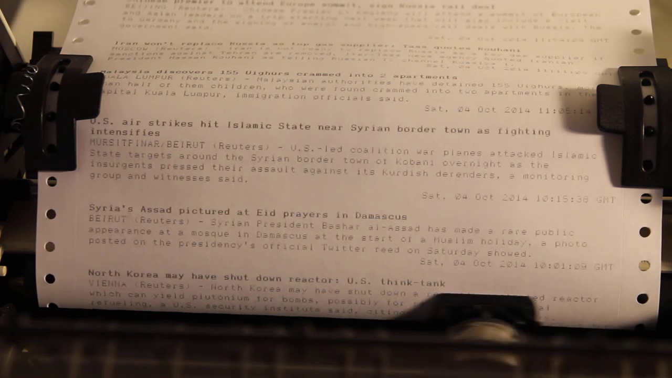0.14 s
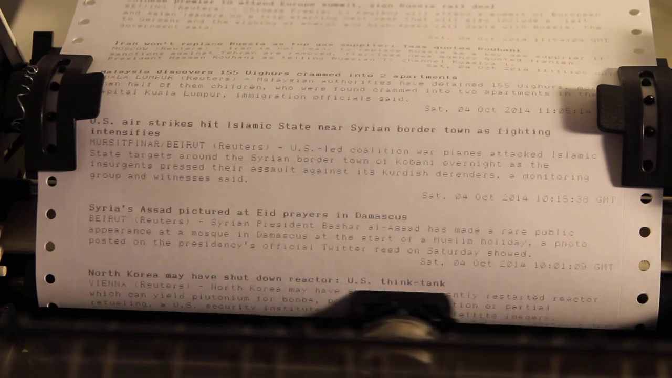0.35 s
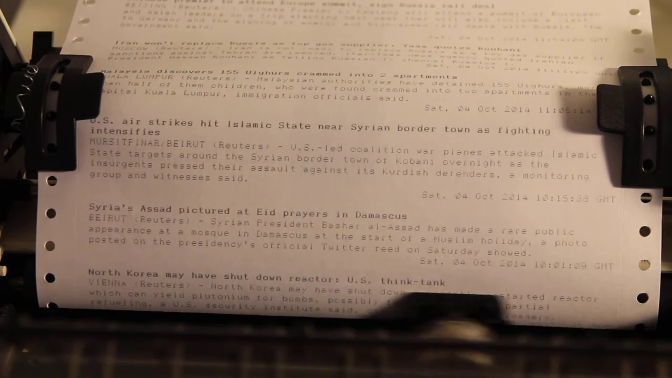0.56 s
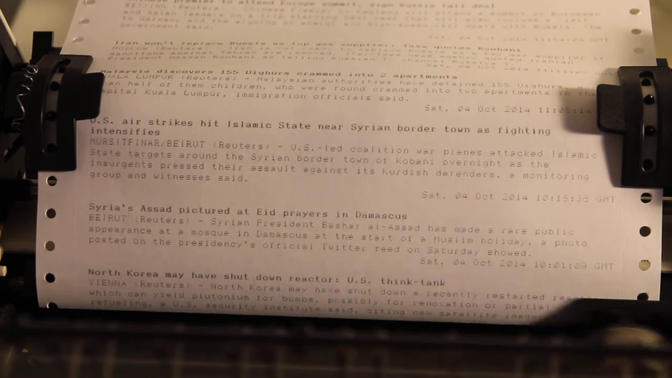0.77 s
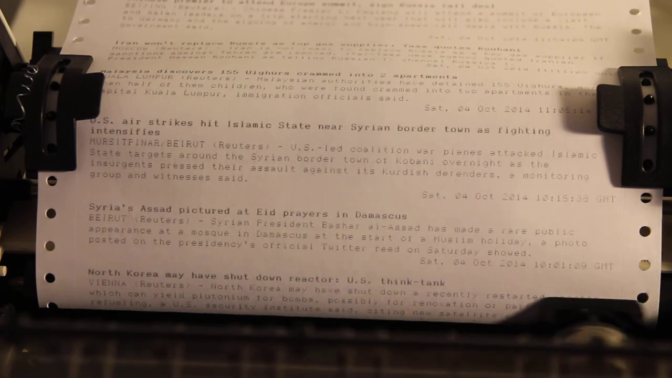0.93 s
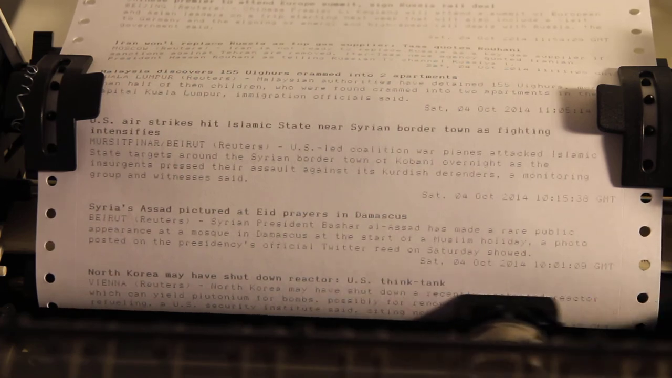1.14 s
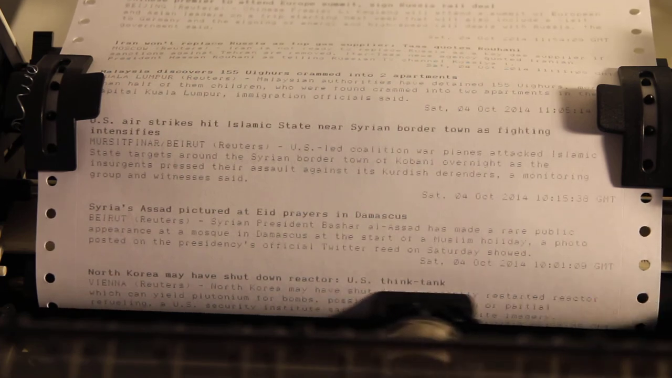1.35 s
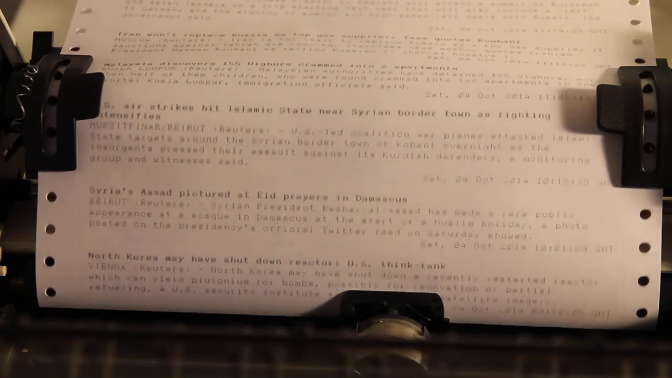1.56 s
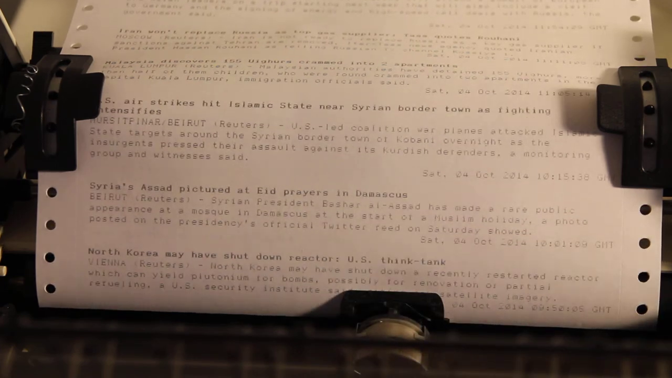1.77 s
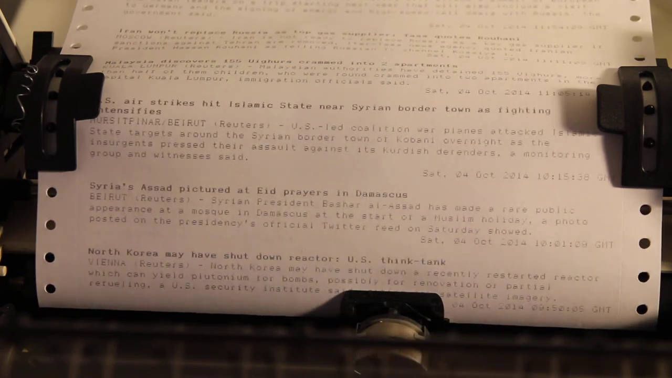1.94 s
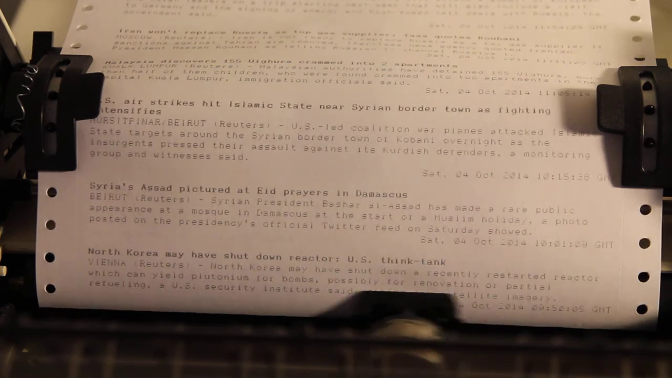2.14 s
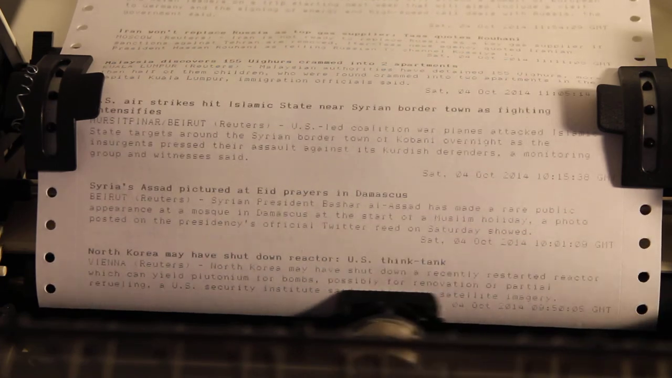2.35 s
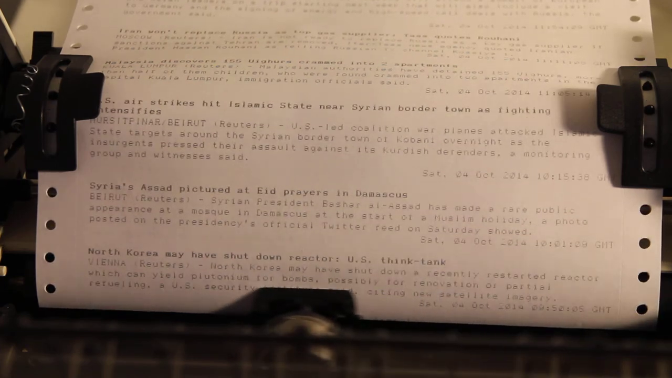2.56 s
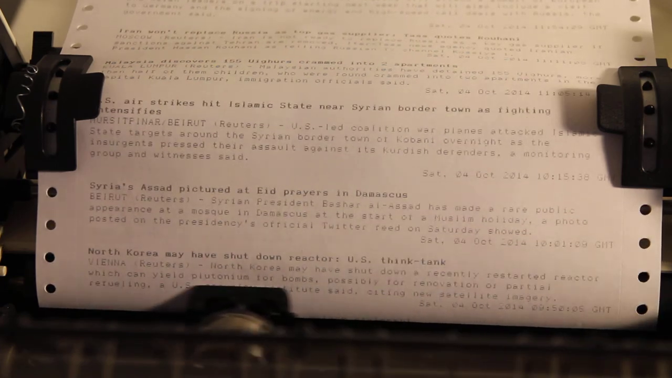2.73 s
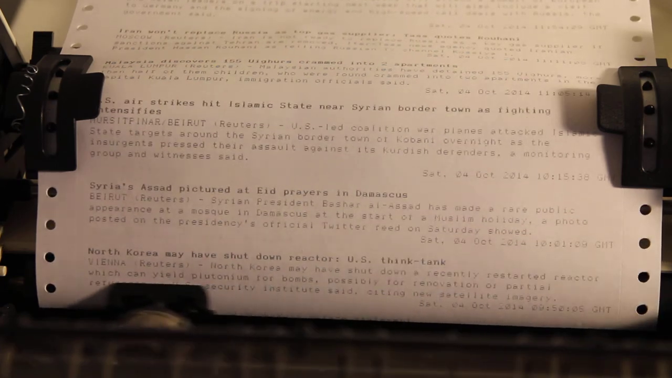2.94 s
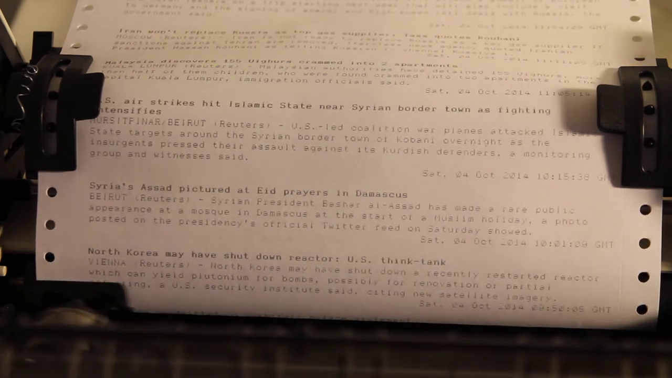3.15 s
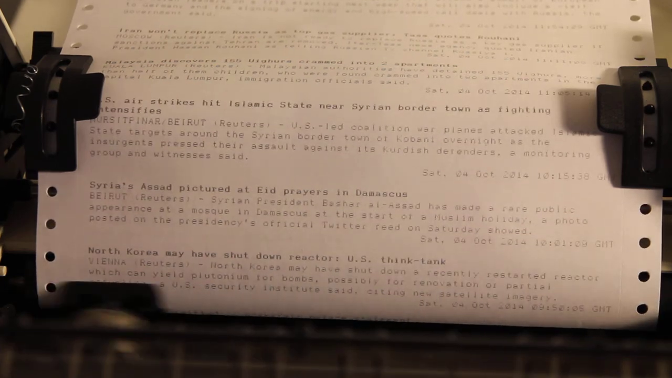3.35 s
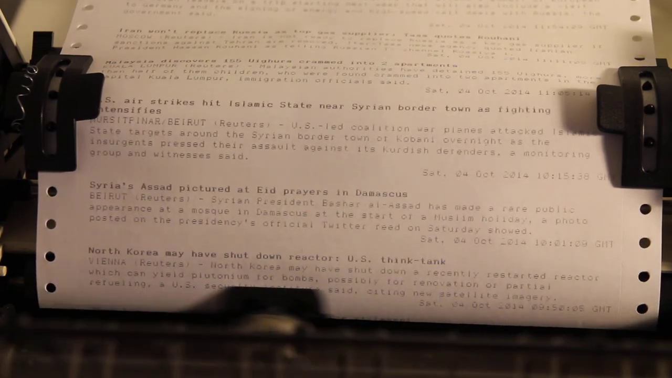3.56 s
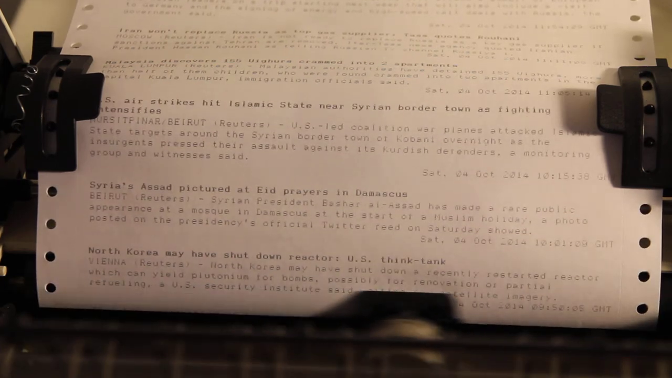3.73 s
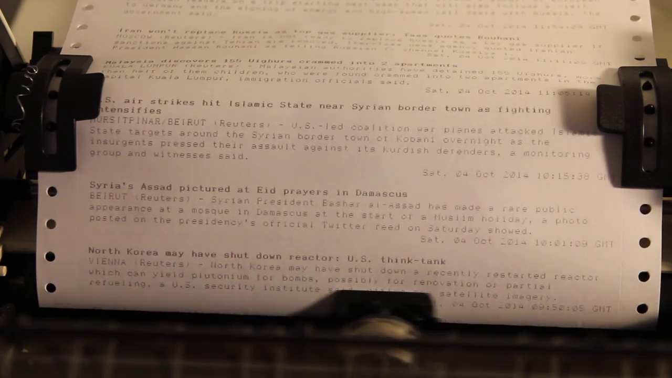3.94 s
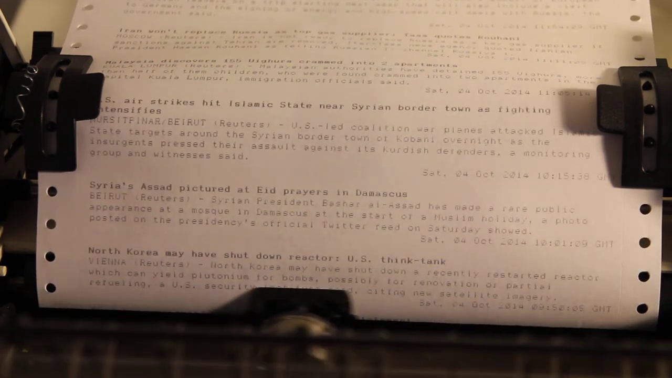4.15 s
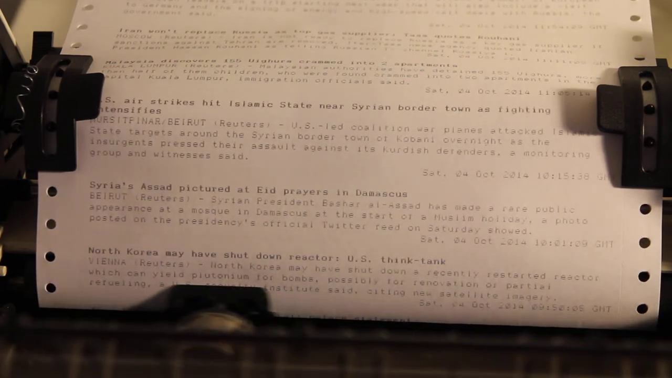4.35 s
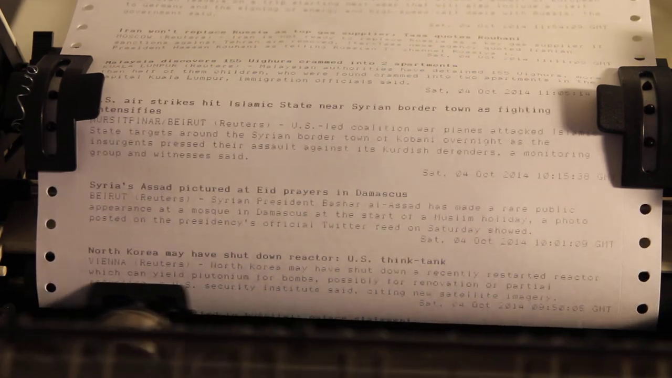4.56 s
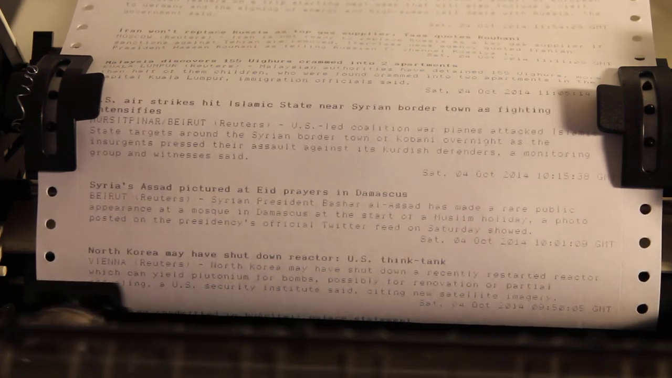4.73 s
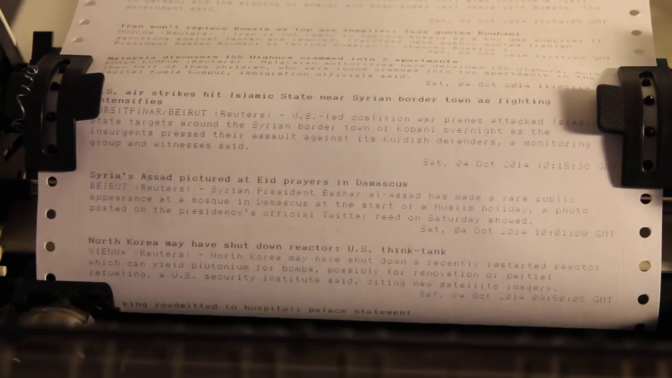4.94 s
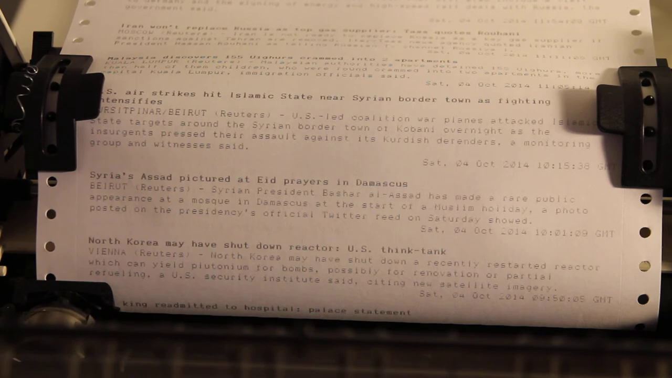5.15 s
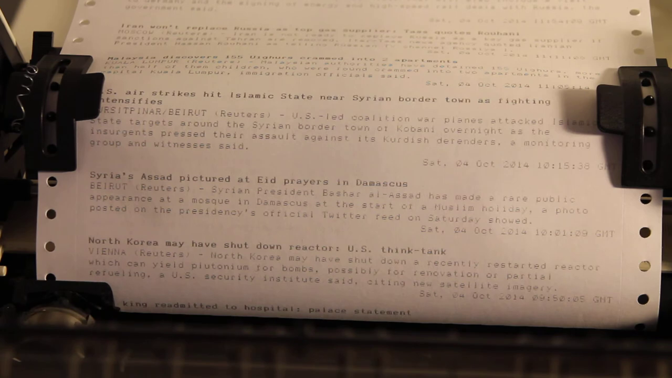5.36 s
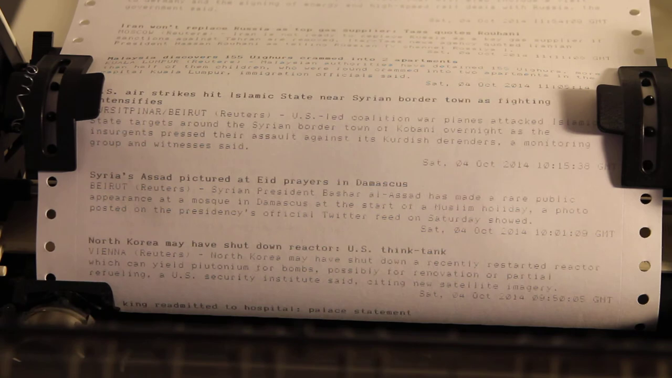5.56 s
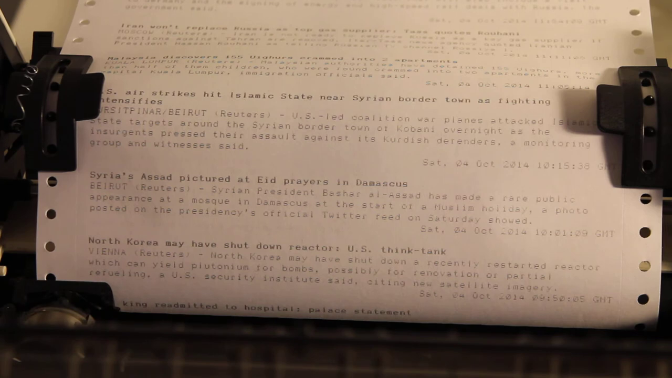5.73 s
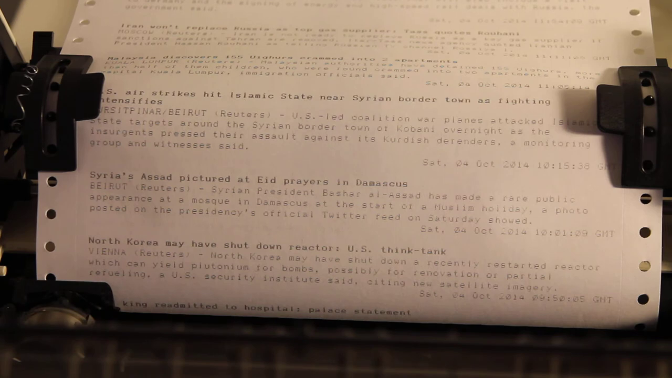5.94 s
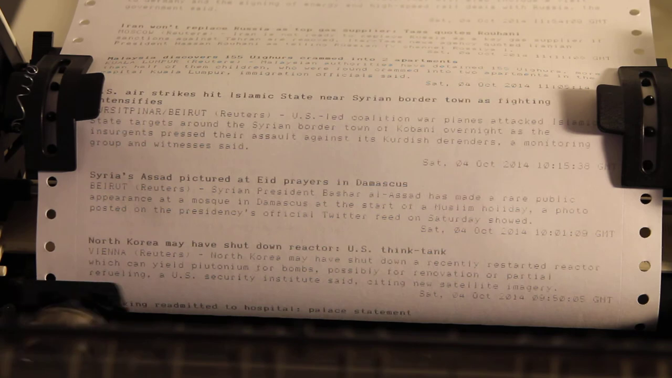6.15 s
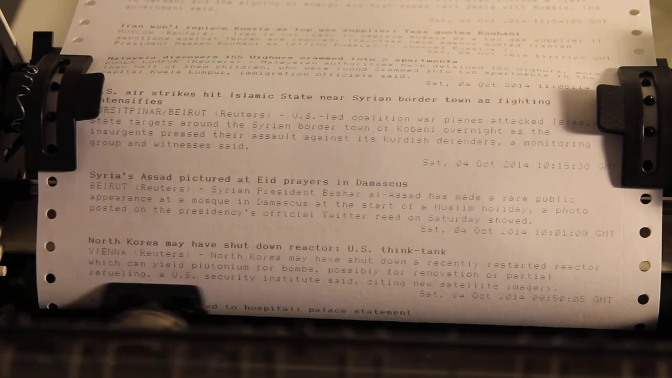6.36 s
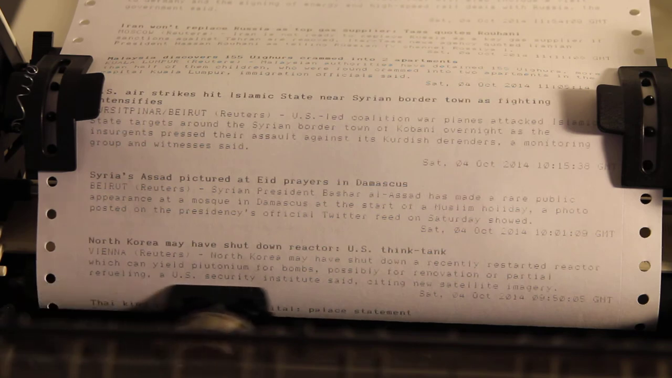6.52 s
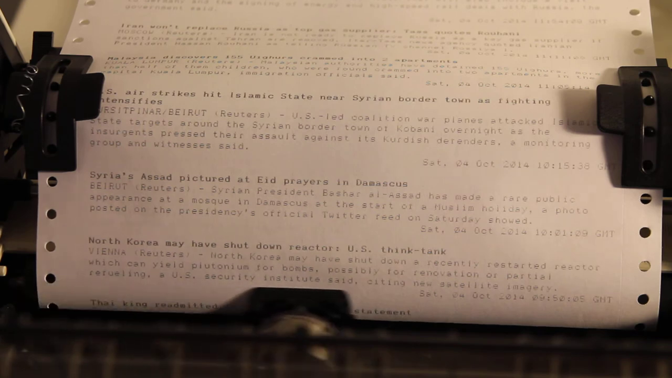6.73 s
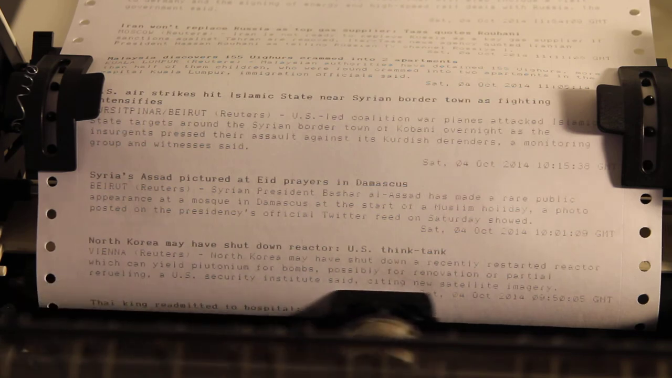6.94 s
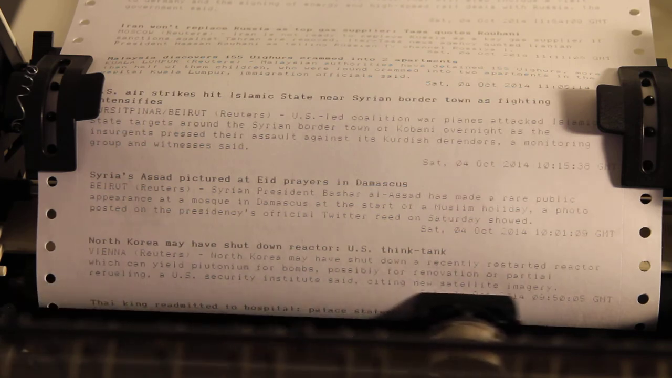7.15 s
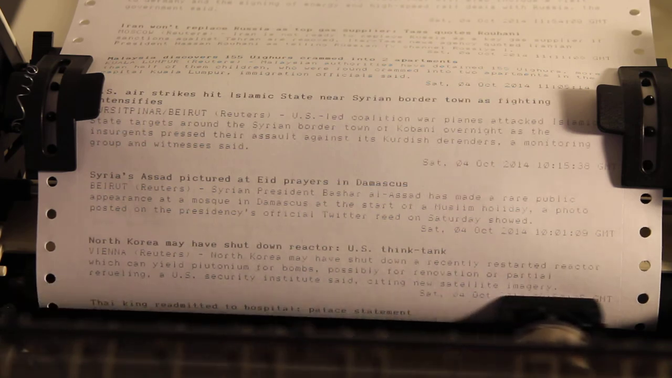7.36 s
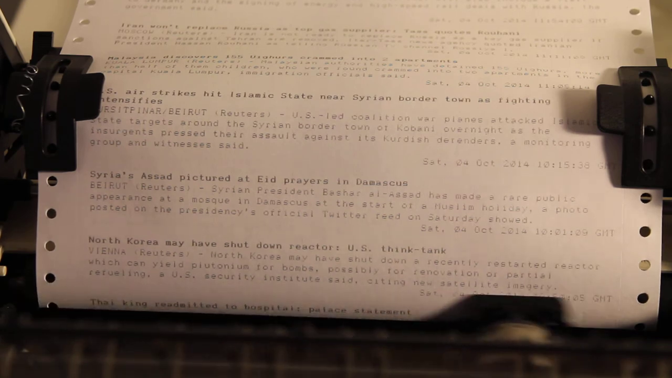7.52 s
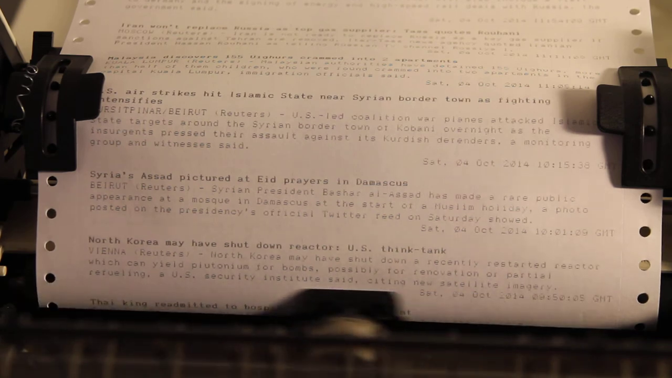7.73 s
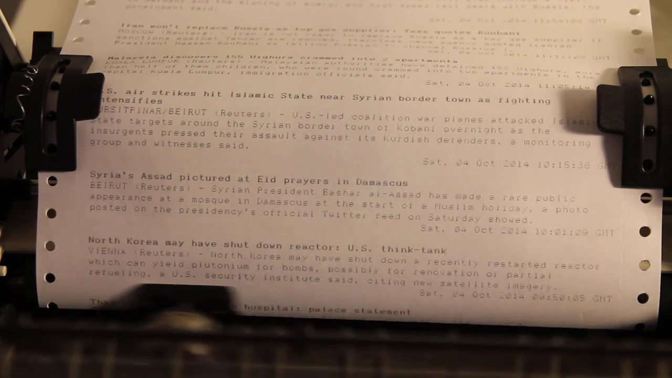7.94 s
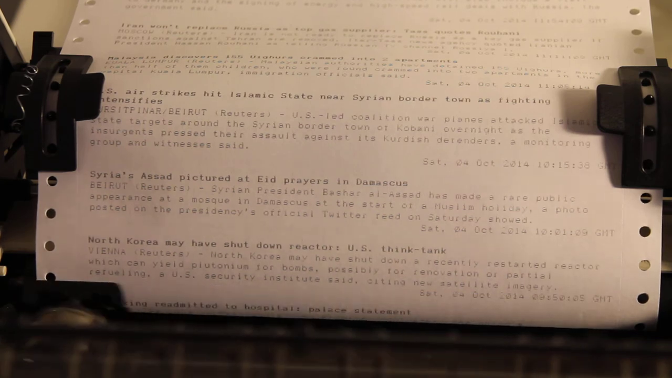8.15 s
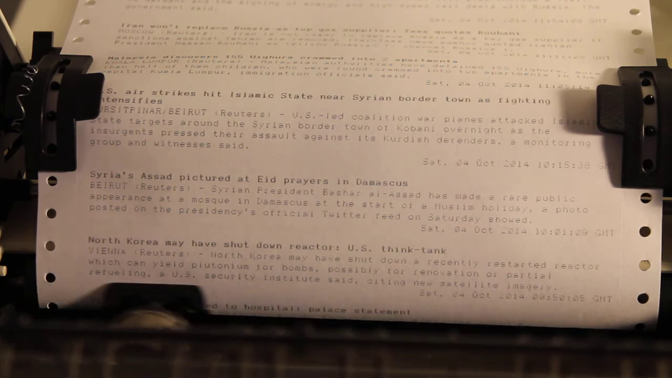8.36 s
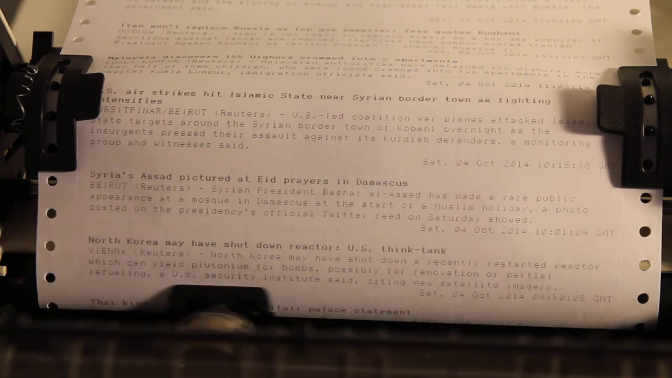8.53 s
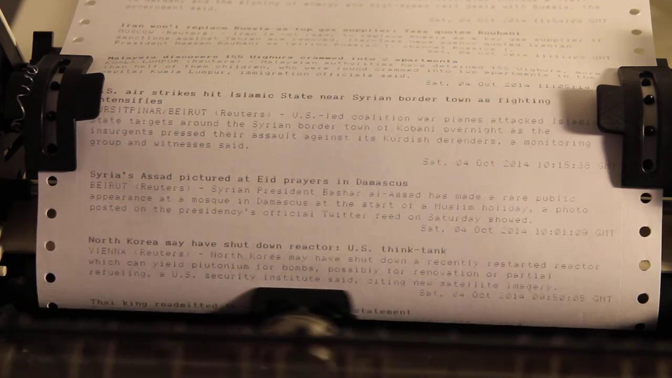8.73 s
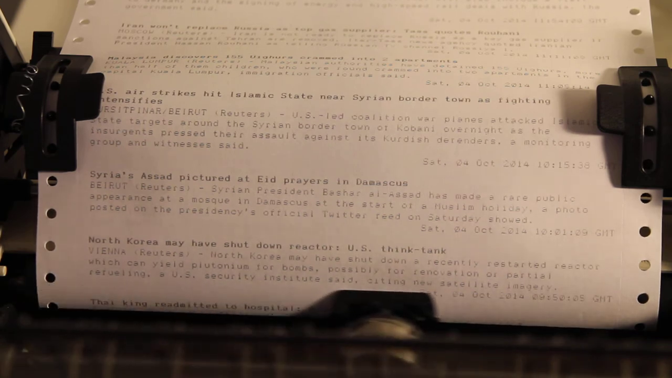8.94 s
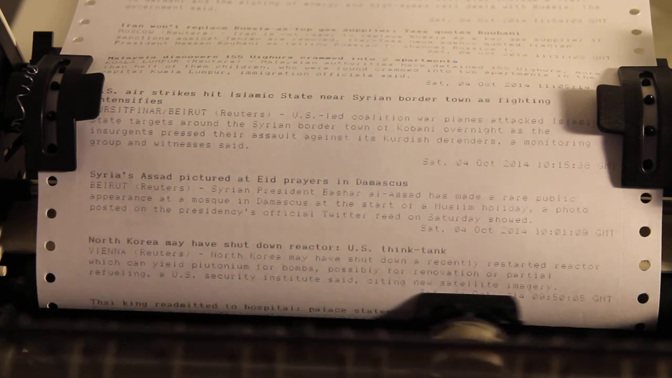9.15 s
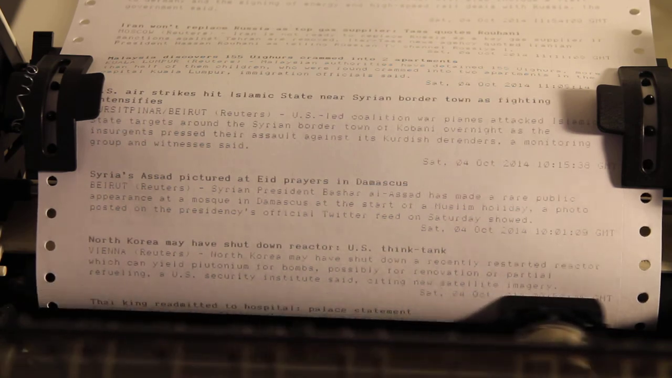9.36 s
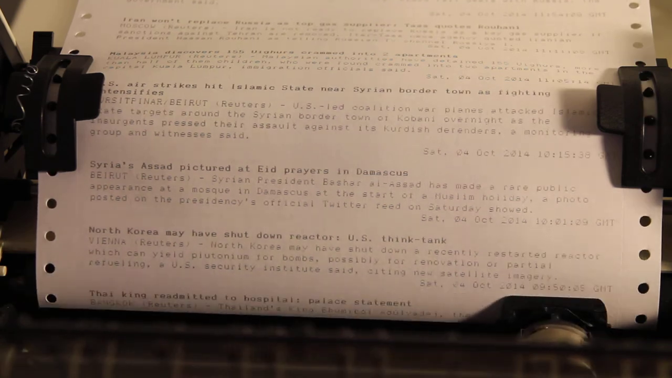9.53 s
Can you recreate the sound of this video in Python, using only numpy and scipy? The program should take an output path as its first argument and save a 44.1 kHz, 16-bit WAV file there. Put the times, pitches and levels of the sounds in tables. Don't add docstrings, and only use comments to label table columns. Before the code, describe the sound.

Close to a small microphone in a quiet room, a dot matrix printer is already mid-pass, its needles rasping metallically. Five more buzzing bursts follow, the later ones longer, each chopped by tiny word gaps. Between them the carriage brakes with a thump, slides back hissing and knocks, its motor whining; the paper feed hums briefly. Two pauses leave only faint mains hum and room air.

```python
import sys
import numpy as np
from scipy import signal
from scipy.fft import rfft, irfft
from scipy.io import wavfile
from scipy.ndimage import uniform_filter1d

SR = 44100
rng = np.random.default_rng(int(sys.argv[2]) if len(sys.argv) > 2 else 0)


def to_wav(s):
    ch = np.atleast_2d(s).T
    pcm = np.round(np.clip(ch, -1, 1) * 32767)
    wavfile.write(sys.argv[1], SR, pcm.astype(np.int16))


def ratio(d):
    e = np.asarray(d, float) / 20
    return 10 ** e


N = 422919
T = np.arange(N) / SR


def printed_columns():
    column_hz, letters_per_s = 1452.1, 60.4
    pass_starts = [-0.1108, 0.9439, 2.35, 3.9243, 6.2487, 8.2464]
    lines = [
        [3, 8, 4, 3, 2, 4],
        [9, 6, 9, 2, 10, 4, 4],
        [7, 9, 1, 10, 4, 8, 10, 3, 7],
    ]
    word_forces = [
        [-33, -33, -33, -32, -32, -32],
        [-33, -33, -32, -33, -30, -33],
        [-29, -30, -30, -30, -29.5, -30.5, -31],
        [-30, -31, -31, -31.5, -31.5, -32, -33],
        [-30.5, -32, -32, -30, -30, -30, -29.5, -30, -31],
        [-32, -35, -58, -34, -33, -33, -33, -34, -35],
    ]
    looseness = [0.55, 0.65, 0.58, .75, .52, .9]
    t = np.arange(int(N / SR * column_hz)) / column_hz
    force, across, loose = np.zeros((3, len(t)))
    for k, (start, forces) in enumerate(zip(pass_starts, word_forces)):
        letters = strokes(lines[k // 2], forces)
        place = (t - start) * letters_per_s
        on = (place >= 0) & (place < len(letters))
        left, right = letters[place[on].astype(int)].T
        across[on] = place[on] % 1
        loose[on] = np.clip(looseness[k], 0, 1)
        force[on] = ratio(np.where(across[on] < .42, left, right))
    force *= ratio(-4.5 * np.clip(1 - across / .35, 0, 1))
    return t, force * (across < .79), across, loose


def strokes(words, forces):
    rows = []
    for size, force_db in zip(words, forces):
        word = force_db + 1.1 * np.clip(rng.standard_normal((size, 2)), -1.6, 1.6)
        word[0, 0] += 1.1
        blank = [(force_db - 20, -90)]
        rows += [word, blank]
    return np.concatenate(rows)


def needle_blows(count=12):
    t, force, across, loose = printed_columns()
    column = np.arange(len(t))
    at = np.round(t * SR).astype(int)
    stroke = (column[:, None] + rng.integers(0, 8, count)) // 8
    chance = rng.random((len(t), count, 4))
    picked = chance[stroke, np.arange(count)]
    run = (picked[..., 0] < .5) & ((column[:, None] + (picked[..., 1] < .3)) % 2 == 0)
    upright = rng.random(len(t)) < .05 + .1 * (across < .12)
    firing = run | upright[:, None] & (chance[..., 2] < .42)
    load = uniform_filter1d(firing.mean(1), size=6) + .05
    blows = (force * (.3 / load) ** .5)[:, None] * firing
    alike = np.sqrt(1 - loose)[:, None] * np.sign(picked[..., 3] - .5)
    varied = np.sqrt(loose)[:, None] * rng.standard_normal(run.shape)
    pushes, hits = np.zeros((2, count, N))
    pushes[:, at] = (blows * ratio(2.5 * rng.standard_normal(run.shape))).T
    hits[:, at] = (blows * (alike + varied)).T
    hits[0, at] += ratio(1.5) * force * upright * np.clip(rng.standard_normal(len(t)), -1.3, 1.3)
    return pushes.sum(0), hits


def needle_clatter(hits, stretch=4096):
    count = len(hits)
    u = np.arange(512) / SR
    dying_s = np.array([.0004] + [.0016] * (count - 1))[:, None]
    clatter = np.zeros(N + 512)
    for first in range(0, N, stretch):
        rattle = rng.standard_normal((count, len(u))) * np.exp(-u / dying_s)
        blows = hits[:, first:first + stretch]
        if not blows.any():
            continue
        rattle /= np.linalg.norm(rattle, axis=1, keepdims=True)
        part = signal.fftconvolve(blows, rattle, axes=1).sum(0)
        clatter[first:first + len(part)] += part
    return clatter[:N]


def platen_and_lid(push, clatter):
    # [f/Hz, width/Hz, level/dB]
    platen = [(700, 90, -26), (1514, 110, -17), (2210, 150, -10), (2940, 130, -6.5), (4030, 90, -7.5),
              (5740, 150, -18.5), (9080, 150, -16.5), (10170, 200, -14), (3650, 120, -9)]
    # [f/Hz, width/Hz, level/dB]
    lid = [(1610, 140, -3.5), (2560, 110, -9.5), (3130, 220, -1.5), (4030, 200, -7), (4620, 200, -3),
           (5560, 250, -4)]
    # [t/s, low ring level/dB, high ring level/dB, lid level/dB]
    place = [
        [(0.0, -5.5, -10, -14), (0.38, -11, -12, -11)],
        [(0.95, -11, -20, -14), (1.43, -6, -9, -10)],
        [(2.35, -6, -8, -8), (3.18, -15, -7.5, -15)],
        [(3.93, -8, -17, -1), (4.76, -13, -10, -8)],
        [(6.25, -10, -12.5, -11), (7.36, -5.5, -10.5, -6)],
        [(8.25, -10, -18, -4.5), (9.36, -10, -12, -6)],
    ]
    stiff = signal.sosfilt(signal.butter(2, 1000, "high", fs=SR, output="sos"), clatter)
    u, out = T[:4096], np.zeros(N)
    for column, modes, drive in ((1, platen[:3], push), (2, platen[3:], push), (3, lid, stiff)):
        body = sum(ratio(db) * ring(u, hz, width) * np.sqrt(width / SR) for hz, width, db in modes)
        out += signal.oaconvolve(drive * ratio(10.5 + curve(place, column=column, rest=0)), body)[:N]
    return out


def print_head():
    # [f/Hz, level/dB per Hz]
    needle_colour = [(250, -36), (624, -25), (689, -14.5), (1020, -12.5), (1280, -19), (1510, -7.5),
                     (1970, -8), (2210, -5), (2700, -4), (2930, -4.5), (3400, 1.5), (14500, -0.7),
                     (16000, -5)]
    push, hits = needle_blows()
    clatter = needle_clatter(hits)
    out = ratio(10.3) * coloured(clatter, needle_colour, 1300, 20000) + platen_and_lid(push, clatter)
    return signal.sosfilt(signal.butter(4, 400, "high", fs=SR, output="sos"), out)


def room(x):
    # [f/Hz, t/s]
    tail_times = [(500, 0.74), (1500, 0.36), (3500, 0.26), (9000, 0.21), (15000, 0.2)]
    hz, t, z = signal.stft(rng.standard_normal((3, SR // 2)), SR, nperseg=128)
    tails = signal.istft(z * ratio(-60 * t / read(tail_times, hz)[:, None]), SR, nperseg=128)[1]
    turn = np.sqrt(2 / 3) * np.cos(np.pi * (7.3 * T + np.arange(3)[:, None] / 3))
    return signal.oaconvolve(x * turn, tails / np.linalg.norm(tails[0]), axes=1)[:, :N].sum(0)


def carriage_slide():
    # [start t/s, end t/s]
    printing_spans = [(0, .38), (.95, 1.43), (2.35, 3.18), (3.93, 4.76), (6.25, 7.36), (8.25, 9.36)]
    # [f/Hz, level/dB per Hz]
    hiss_colour = [(710, -30), (1200, -2), (2150, -9.5), (3740, -3.5), (4310, -5.5), (8720, -6.5),
                   (14700, -12), (16000, -19)]
    # [f/Hz, level/dB per Hz]
    rattle_colour = [(88, -36), (150, -6.5), (194, 1.5), (322, -4), (367, -1), (522, 0.5), (827, -1.5),
                     (2500, -10), (3250, -37.5), (5500, -120)]
    # [f/Hz, width/Hz, level/dB]
    case_modes = [(100, 30, -79), (183, 45, -74)]
    roughness = evened(uniform_filter1d(rng.standard_normal(N), 150))
    grain = rng.standard_normal((3, N)) * ratio(1.4 * roughness)
    printing = sum(moving(*span) for span in printing_spans)
    out = ratio(-2.5) * motion(column=1, knock_fall=430) * coloured(grain[0], hiss_colour, 2000, 17000)
    belt = ratio(-2.3) * motion(column=2, knock_fall=200) + ratio(-68) * printing
    out += belt * coloured(grain[1], rattle_colour, 150, 1400)
    for hz, width, db in case_modes:
        shaken = signal.oaconvolve(np.gradient(grain[2]), ring(T[:8192], hz, width))[:N]
        out += ratio(db) * printing * evened(shaken)
    return out


def motion(column, knock_fall):
    # [start t/s, end t/s, rail hiss level/dB, belt rattle level/dB]
    runs = [(0.54, 0.9, -57, -62), (1.46, 1.64, -60, -62), (2.178, 2.34, -60, -62), (3.35, 3.885, -55, -61),
            (4.79, 4.89, -57, -61), (6.18, 6.245, -63, -63), (7.535, 8.205, -55, -60),
            (9.39, 9.5, -59, -60)]
    # [t/s, rail hiss level/dB, belt rattle level/dB]
    brakes = [(0.43, -50, -52), (1.47, -50, -59), (3.25, -51, -51), (4.8, -52, -60), (7.435, -50, -50),
              (9.43, -52, -55)]
    # [t/s, rail hiss level/dB, belt rattle level/dB]
    knocks = [(0.54, -54, -57), (0.559, -43, -54), (0.85, -48, -54), (0.9, -53, -55), (2.178, -50, -54),
              (2.204, -45, -56), (2.258, -40, -51), (3.354, -44, -55), (3.37, -41, -52), (3.838, -50, -51),
              (3.882, -50, -58), (5.045, -80, -74), (6.184, -55.5, -64), (6.222, -52, -60),
              (7.535, -49, -60), (7.549, -42, -53), (8.158, -44, -56), (8.175, -47, -55)]
    power = sum(swell(row[0], row[1], row[1 + column], 6000, 280) for row in runs)
    power = power + sum(swell(row[0], row[0], row[column], 150, 210) for row in brakes)
    power = power + sum(swell(row[0], row[0], row[column], 5000, knock_fall) for row in knocks)
    return np.interp(T, T[::32], np.sqrt(power))


def case_rocking():
    # [t/s, peak level/dB]
    lurches = [(0.434, -45), (0.474, -49), (0.866, -48), (1.482, -55), (2.187, -56), (2.272, -44),
               (3.234, -49), (3.289, -53), (3.379, -52), (3.84, -48.5), (4.799, -52), (6.189, -72),
               (7.419, -48), (7.469, -49), (7.539, -52), (8.154, -51), (9.409, -54)]
    out = np.zeros(N)
    for s, db in lurches:
        part = out[round(s * SR):][:SR // 2]
        u = T[:len(part)]
        rock = ring(u, 86, 8.5) + ring(u, 106, 7.5)
        rock += .9 * ring(u, 195, 16) + .9 * ring(u, 325, 20) + .3 * ring(u, 600, 25)
        part += ratio(db - 2.8) * rock * (1 - np.exp(-u / .009))
    return out


def stepper_whine():
    # [start t/s, end t/s, step f/Hz, list of (multiple, level/dB)]
    returns = [
        (0.623, 0.847, 272.3, [(1, -67), (2, -74)]),
        (3.425, 3.817, 255, [(1, -66), (2, -68), (5, -76)]),
        (7.603, 8.148, 257.5, [(1, -88), (3, -66), (4.32, -66), (7, -67), (8, -84.5), (14, -67), (15, -63), (16, -68)]),
    ]
    pulley_hz, pulley_db, pulley_lag_s = 7.7, 6, .045
    out = np.zeros(N)
    waver = ratio(-2.0 + 1.3 * evened(uniform_filter1d(rng.standard_normal(N), 3000)))
    for start, end, step_hz, orders in returns:
        on = slice(round(start * SR) - 900, round(end * SR) + 900)
        t = T[on]
        throb = ratio(pulley_db * np.cos(2 * np.pi * pulley_hz * (t - start - pulley_lag_s)) - 3)
        whine = np.zeros(len(t))
        for k, db in orders:
            tone = np.sin(2 * np.pi * k * step_hz * t + k * k)
            whine += ratio(db) * (throb if k < 6 else 1) * tone
        out[on] += (moving(start, end) * waver)[on] * whine
    return out


def paper_feed():
    # [start t/s, end t/s, motor f/Hz, level/dB]
    feeds = [
        (1.488, 1.68, 200.3, -59.5),
        (4.825, 4.918, 200.5, -60),
        (9.43, 9.55, 198, -60.5),
    ]
    return sum(np.sqrt(2) * ratio(db) * moving(start, end) * np.sin(2 * np.pi * hz * T)
               for start, end, hz, db in feeds)


def background():
    # [f/Hz, level/dB]
    hum_tones = [(120, -80), (240, -81.5), (360, -83), (720, -92.5)]
    # [f/Hz, level/dB per Hz]
    air_colour = [(30, -2), (70, 6.5), (200, 8.5), (500, 2), (1200, 0), (3000, -8.5), (16000, -15.5)]
    hum = sum(np.sqrt(2) * ratio(db) * np.sin(2 * np.pi * hz * T + hz) for hz, db in hum_tones)
    return hum + ratio(-81.5) * coloured(rng.standard_normal(N), air_colour, 330, 16000)


def evened(x):
    return x / np.sqrt(np.mean(x ** 2) + 1e-20)


def read(points, hz):
    f, value = np.transpose(points)
    return np.interp(np.log(hz + 1), np.log(f + 1), value)


def curve(tables, column, rest):
    out = np.full(N, rest, float)
    for rows in map(np.array, tables):
        on = (T >= rows[0, 0]) & (T <= rows[-1, 0] + .025)
        out[on] = np.interp(T[on], rows[:, 0], rows[:, column])
    return uniform_filter1d(out, size=60)


def coloured(x, points, lo_hz=20, hi_hz=16000):
    hz = np.fft.rfftfreq(len(x), 1 / SR)
    gain = ratio(read(points, hz))
    in_band = (hz > lo_hz) * (hz < hi_hz)
    return irfft(rfft(x) * gain / np.sqrt(np.mean(gain ** 2 * in_band)), len(x))


def ring(t, hz, width):
    return np.sin(2 * np.pi * hz * t) * np.exp(-np.pi * width * t)


def moving(start, end):
    return uniform_filter1d(1. * (T > start) * (T < end), size=900)


def swell(start, end, db, rise, fall):
    t = T[::32]
    return ratio(db - rise * np.clip(start - t, 0, 1) - fall * np.clip(t - end, 0, 1)) ** 2


def scene():
    head = print_head()
    carriage = carriage_slide() + case_rocking() + stepper_whine()
    return (head + ratio(-6) * room(head) + carriage + paper_feed() + background())[None]


def top_cut(x):
    return signal.sosfilt(signal.butter(12, 16660, fs=SR, output="sos"), x)


def record(dry):
    edge = signal.firwin(601, 15820, window=("kaiser", 8), fs=SR)
    mix = signal.oaconvolve(dry, edge[None], "same") - .0026
    return top_cut(mix)


dry = scene()
out = record(dry)
to_wav(out)
```